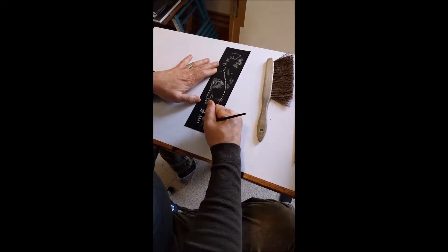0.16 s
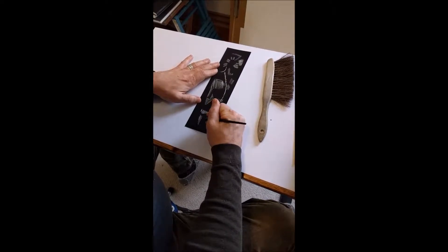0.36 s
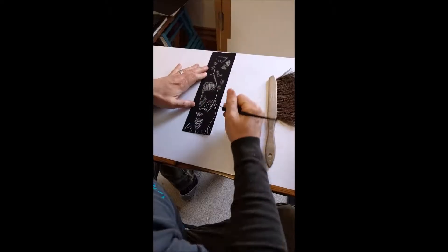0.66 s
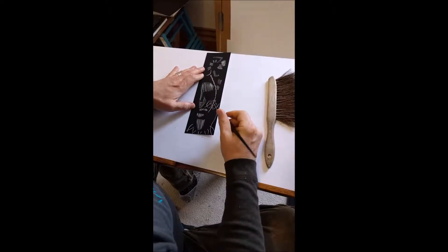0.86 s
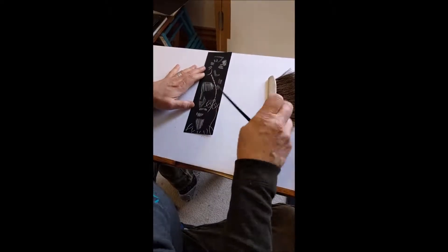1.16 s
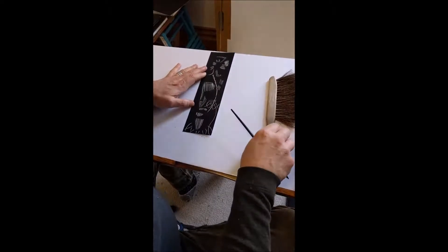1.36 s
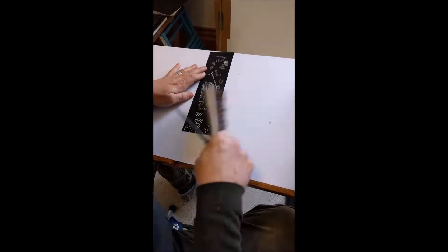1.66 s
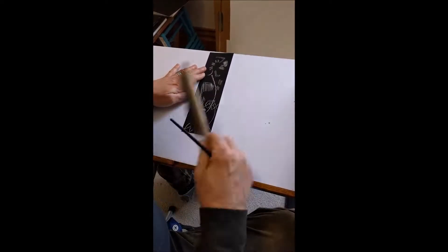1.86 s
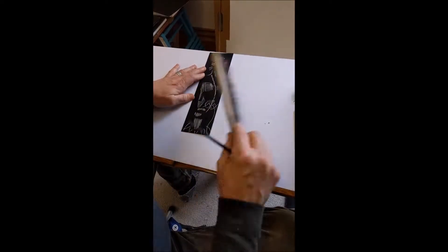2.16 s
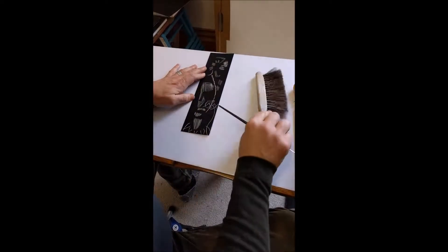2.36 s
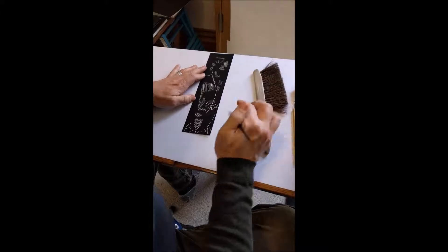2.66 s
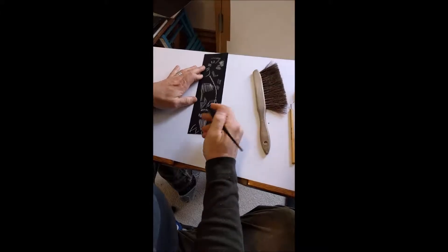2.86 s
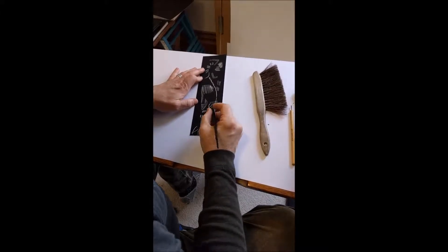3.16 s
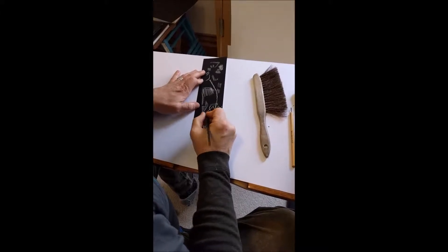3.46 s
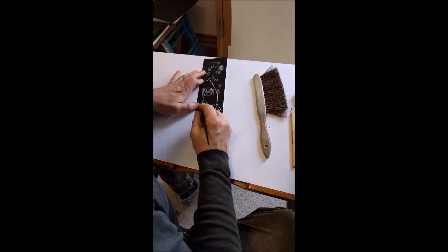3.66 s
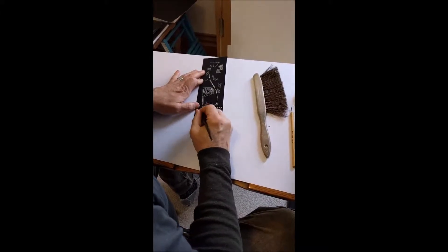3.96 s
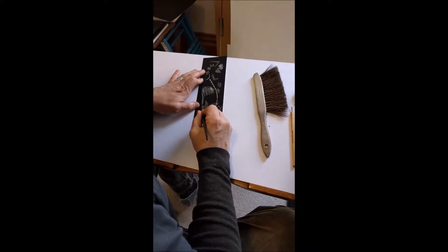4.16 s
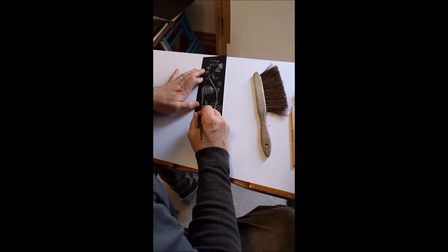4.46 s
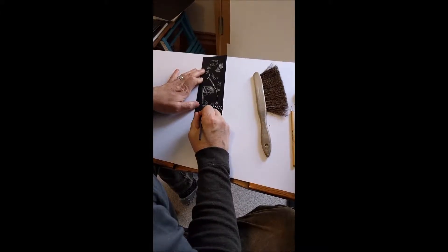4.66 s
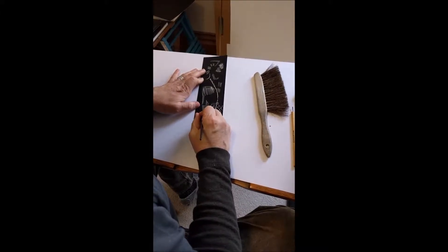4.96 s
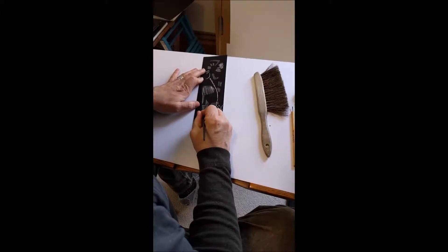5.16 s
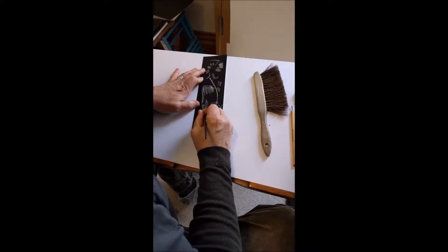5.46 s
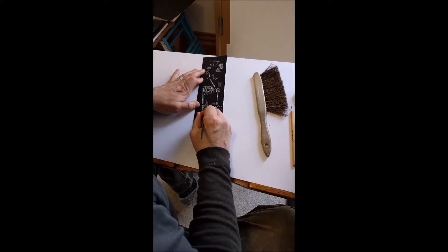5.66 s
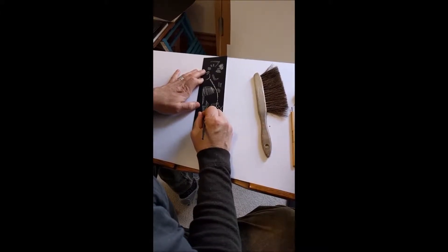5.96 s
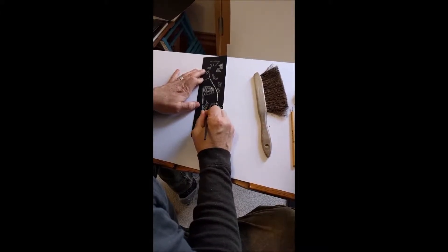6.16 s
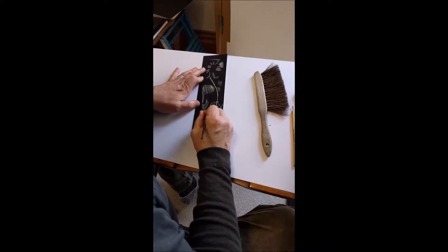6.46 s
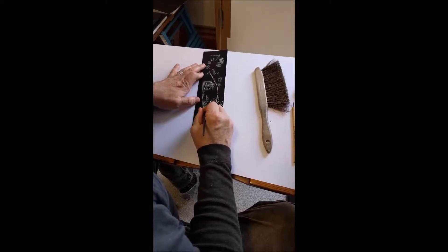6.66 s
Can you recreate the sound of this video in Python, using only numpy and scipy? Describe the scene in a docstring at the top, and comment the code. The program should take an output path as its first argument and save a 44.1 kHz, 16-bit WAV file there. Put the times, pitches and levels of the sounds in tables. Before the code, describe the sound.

A fine blade scratches a coated board, a stiff brush sweeps and knocks loudly on the table, then seven crisp short scratches follow indoors.

```python
"""Scratching a coated board

A fine blade scratches short strokes into a coated board on a table in a small room: chips of random noise.
In between, a hand brush sweeps the dust off (bursts of noise), is knocked on the table edge and laid down
(ringing modes). Hand and sleeve slide softly over the paper; the blade ticks down and scratches seven more times.
The recorder's noise gate turns everything down, with the room's rumble and hiss, when little else sounds."""
import sys
import numpy as np
from scipy import signal
from scipy.fft import rfft, irfft
from scipy.io import wavfile
from scipy.ndimage import uniform_filter1d

SR = 44100
rng = np.random.default_rng(int(sys.argv[2]) if len(sys.argv) > 2 else 0)


def persist_wave(psi):
    """Save psi, clipped to +-1, as 16-bit WAV."""
    counts = np.round(np.clip(psi, -1, 1) * 32767).astype(np.int16)
    wavfile.write(sys.argv[1], SR, np.atleast_2d(counts).T)


N = 300762  # length of the scene [samples]


def gain_of(db):
    """Turns decibels into a factor to multiply a sound by."""
    return 10 ** (np.asarray(db) / 20)


def evened(x):
    """Scales a sound to an average strength (rms) of 1."""
    return x / np.sqrt(np.mean(x ** 2) + 1e-20)


def read(points, hz):
    """Reads a curve at the frequencies hz, with straight lines between its points on a log-frequency axis."""
    point_hz, value = np.transpose(points)
    return np.interp(np.log(hz + 1), np.log(point_hz + 1), value)


def add(mix, start, sound):
    """Lays a sound into the mix, beginning at start seconds."""
    part = mix[max(round(start * SR), 0):][:len(sound)]
    part += sound[:len(part)]


def coloured(x, spectrum, size=4096):
    """Filters a sound to a spectrum; the filter rings only after a click, so the front stays sharp."""
    hz = abs(np.fft.fftfreq(size, 1 / SR))
    log_gain = np.log(gain_of(read(spectrum, hz)))
    # minimum phase: the phase follows from the log gain
    minimum_phase = np.exp(np.conj(signal.hilbert(log_gain)))
    response = np.fft.ifft(minimum_phase).real[:size // 2]
    return evened(signal.oaconvolve(x, response)[:N])


def wander(per_s):
    """A smooth random curve of rms 1 whose changes fade out above about per_s a second."""
    hz = np.fft.rfftfreq(N, 1 / SR)
    slow = rfft(rng.standard_normal(N)) * np.exp(-(hz / per_s) ** 2)
    return evened(irfft(slow, N))


def friction(slips_per_s, spread_db, hiss, catch_db, catches_per_s):
    """Rubbing: tiny slips of uneven size over a smooth hiss, which bunch where the surface catches."""
    size = gain_of(spread_db * np.minimum(rng.exponential(1, N), 4))
    direction = rng.choice([-1, 1], N)
    happens = rng.random(N) < slips_per_s / SR
    slips = evened(size * direction * happens)
    catching = gain_of(catch_db * wander(catches_per_s))
    return (slips + hiss * rng.standard_normal(N)) * catching


def ring(modes, contact_s, tilt_db=0):
    """A struck object: its modes start together and die away; a longer contact softens the onset."""
    t = np.arange(SR // 2) / SR
    swing = np.zeros(len(t))
    for hz, db, t60 in modes:
        # the tilt, in dB per octave, counts from the first mode in the list
        tilted_db = db + tilt_db * np.log2(hz / modes[0][0])
        swing += gain_of(tilted_db - 60 * t / t60) * np.cos(2 * np.pi * hz * t)
    onset = 1 - np.exp(-(t / contact_s) ** 2)
    b, a = signal.butter(3, 100, "high", fs=SR)  # little deep bass below 100 Hz sounds in the ring
    return -signal.lfilter(b, a, swing * onset)


def clock():
    """Times in seconds, half a millisecond apart, at which movements are worked out."""
    return np.arange(0, N, 22) / SR


def glide(start, length, db, skew, power):
    """Gain of one hand movement: its speed rises and falls in one arch, with an early peak if skew is under 1."""
    way = np.clip((clock() - start) / length, 0, 1)
    speed = abs(np.sin(np.pi * way ** skew))
    return gain_of(db) * speed ** power


def swell(start, rise_s, db, power, release_db_per_s):
    """Gain of a push that builds for rise_s and then dies away."""
    t = clock() - start
    build = np.clip(t / rise_s, 0, 1) ** power
    return build * gain_of(db - release_db_per_s * np.maximum(t - rise_s, 0))


def together(gains):
    """One gain for every sample; overlapping movements add in power."""
    total = np.sqrt(sum(gain ** 2 for gain in gains))
    return np.interp(np.arange(N) / SR, clock(), total)


# colour of the room's rumble and hiss: (frequency [Hz], level [dB per Hz])
AIR_COLOUR = [(20, -8), (50, 0), (90, -1), (130, -6), (300, -10), (700, -18), (1500, -25), (5400, -28),
              (6920, -20), (8600, -29), (16000, -30)]
AIR_DB = -61.5  # rms level ahead of the gate


def room_air():
    """The room's steady rumble and hiss: random noise, strongest in the bass."""
    return gain_of(AIR_DB) * coloured(rng.standard_normal(N), AIR_COLOUR)


# how long the room's echoes last: (frequency [Hz], time to fall by 60 dB [s])
ROOM_DECAY = [(150, 0.18), (500, 0.38), (1500, 0.23), (4000, 0.1839), (7000, 0.2067), (14000, 0.22)]
# how strong they are: (frequency [Hz], level [dB])
ROOM_LEVEL = [(150, -10), (400, -3), (600, -11), (900, -1.5), (1450, -2.5), (2000, -3), (7000, -5.5),
              (14000, -19)]
# first echoes from things on and near the table: (delay [s], level [dB])
EARLY_ECHOES = [(.0043, -14.5), (0.01, -16.5), (0.0225, -21)]


def room(x, tail_delay_s=0.0035):
    """Sparse echoes of random sign from near walls and furniture, each band dying at its own speed."""
    count = SR // 2
    taps = rng.standard_normal(count) * (rng.random(count) < 0.12)
    hz, t, bands = signal.stft(taps / np.linalg.norm(taps), SR, nperseg=256)
    t60 = read(ROOM_DECAY, hz)[:, None]
    # the square root keeps a long decay from carrying more energy than a short one
    decay = gain_of(-60 * t / t60) * np.sqrt(np.log(1000) / t60)
    level = gain_of(read(ROOM_LEVEL, hz))[:, None]
    tail = signal.istft(bands * decay * level, SR, nperseg=256)[1]
    echoes = np.zeros(N)
    add(echoes, tail_delay_s, signal.fftconvolve(x, tail))
    # small surfaces throw back only short waves
    treble = signal.sosfilt(signal.butter(1, 1500, "high", fs=SR, output="sos"), x)
    for delay, db in EARLY_ECHOES:
        add(echoes, delay, gain_of(db) * treble)
    return echoes


# slides of hand and sleeve over the paper: (start [s], length [s], level [dB])
SLEEVE_SLIDES = [(0.264, 0.25, -62), (0.424, 0.052, -56), (0.475, 0.26, -66), (2.162, 0.37, -56),
                 (2.466, 0.27, -51), (2.816, 0.16, -65.5), (2.893, .25, -52), (3.091, .47, -53),
                 (3.527, 0.27, -60.5)]
# colour of the sliding: (frequency [Hz], level [dB per Hz])
SLEEVE_COLOUR = [(400, -38), (1200, -16), (1900, -14), (3580, -6), (5500, -4.5), (6900, 5), (7700, -3),
                 (9300, -13), (16000, -23.5)]
SLIDE_SKEW, SLIDE_POWER = 0.72, 1.41  # fastest before the middle; sound grows as speed to this power


def sleeve():
    """Skin and cloth hiss softly on the paper, louder the faster they slide."""
    fibres = friction(slips_per_s=1500, spread_db=2.0, hiss=1.2, catch_db=0.6, catches_per_s=100)
    sliding = together(glide(*slide, SLIDE_SKEW, SLIDE_POWER) for slide in SLEEVE_SLIDES)
    return sliding * coloured(fibres, SLEEVE_COLOUR)


# the wooden brush meets the table:
# (time [s], thud level [dB], thud tilt [dB per octave], clack level [dB], click level [dB])
BRUSH_KNOCKS = [(0.6989, -56.5, -1, -39.5, -34), (0.7072, -48.5, -5, -38.5, -47),
                (0.7228, -60, -1, -44, -38), (0.756, -47.5, -4, -35.5, -28),
                (1.188, -40.5, 2, -19.5, -19.5), (1.2042, -56, 2, -29, -23), (1.237, -36, 0, -39.5, -21.5),
                (1.6151, -18, -0.5, -27, -7), (1.6621, -31, -5, -42, -43), (1.739, -21.5, 0.5, -52.5, -22),
                (1.764, -42.5, 7.5, -23.5, -15.5), (1.7802, -23, -0.5, -29.5, -44.5),
                (2.1525, -65, -11, -43.5, -24.5), (2.194, -66.5, 6, -48, -36.5),
                (2.826, -62, 0.5, -62.5, -50.5)]
# modes of the table before the tilt, which sound as the thud: (frequency [Hz], level [dB], time to fall by 60 dB [s])
TABLE_MODES = [(182, 9, 0.016), (148.6, -14.5, 0.16), (199.7, -13, .33), (254.7, -12.5, 0.31),
               (291, -17, 0.26), (388.6, -6.5, 0.11), (409, -8.5, 0.13), (450, -15, 0.0033), (530, -28, .2),
               (811.6, -17, .14), (890, -17, .12), (960, -14, 0.0096), (994, -25.5, 0.13), (1240, -22, 0.2),
               (1366, -15, 0.047), (1467, -16, 0.094), (1520, -12.5, 0.044)]
# modes of the brush's handle, the clack: (frequency [Hz], level [dB], time to fall by 60 dB [s])
HANDLE_MODES = [(1624, -15.5, 0.018), (2751, -8, 0.0091), (3167, 2, 0.0078), (3530, -1.5, 0.01),
                (4430, -12, .006)]
# modes of the brush's hard edge, the click: (frequency [Hz], level [dB], time to fall by 60 dB [s])
EDGE_MODES = [(5700, -13.5, 0.0036), (7117, -9.5, 0.011), (7064, 0, .005), (10000, -22.5, .001)]


def knocks():
    """Each blow rings the table, the handle and the brush's hard edge; the tilt makes the thud bright or dull."""
    out = np.zeros(N)
    clack = ring(HANDLE_MODES, contact_s=0.00017)
    click = ring(EDGE_MODES, contact_s=0.000098)
    for start, thud_db, tilt_db, clack_db, click_db in BRUSH_KNOCKS:
        thud = ring(TABLE_MODES, contact_s=0.00025, tilt_db=tilt_db)
        add(out, start, gain_of(thud_db) * thud + gain_of(clack_db) * clack + gain_of(click_db) * click)
    return out


# bristles bend against paper or board, then spring free: (start [s], bending time [s], level [dB])
BRISTLE_SWEEPS = [(0.67, 0.048, -45), (0.732, 0.027, -30), (0.802, 0.023, -39.5), (0.828, 0.079, -37),
                  (0.996, 0.056, -58), (1.144, 0.004, -45.5), (1.154, 0.0096, -46.5), (1.179, 0.03, -31.5),
                  (1.197, 0.023, -31), (1.221, 0.1, -36), (1.593, 0.0067, -29.5), (1.723, 0.071, -40),
                  (1.88, 0.129, -62), (2.138, 0.027, -44)]
# colour of the flicking tips: (frequency [Hz], level [dB per Hz])
BRISTLE_COLOUR = [(590, -59), (1000, -34), (1400, -25.5), (1980, -30.5), (2200, -22.5), (2680, -24.5),
                  (2810, -18), (4680, -3), (6700, 3.5), (9940, -13.5), (13300, -21.5), (16000, -23)]
BEND_POWER, SPRING_DB_PER_S = 0.85, 540  # how the sound grows as they bend, and dies when they let go
# the pressed-down brush drags: (start [s], pressing time [s], level [dB])
BRUSH_DRAGS = [(.669, .035, -41), (.745, 0.016, -41.5), (.785, 0.035, -50), (.905, 0.014, -50.5),
               (1.186, .004, -44.5), (1.235, 0.0039, -33.5)]
# colour of the board that takes up the drag: (frequency [Hz], level [dB per Hz])
BOARD_COLOUR = [(60, -10), (135, 2.5), (200, -8), (320, -9.5), (405, 4), (480, -17.5), (680, -21),
                (790, -2.5), (900, -28), (1400, -17), (2000, -20.5), (3000, -17), (6000, -25), (16000, -57)]
PRESS_POWER, EASE_DB_PER_S = 1.2, 400.5  # how the drag grows under pressure, and how fast it dies
# bristles quiver after the brush is flung against the edge: (start [s], level [dB])
BRISTLE_QUIVERS = [(1.593, -31), (1.738, -43.5)]
# colour of the quivering hairs: (frequency [Hz], level [dB per Hz])
HAIR_COLOUR = [(3000, -40), (6000, -23.5), (6800, -7), (7050, 2), (7300, -1), (7700, -5.5), (8600, -19),
               (12000, -39.5), (16000, -45)]
QUIVER_RISE_S, QUIVER_POWER, QUIVER_DB_PER_S = 0.0041, 0.99, 169.5


def bristles():
    """Many stiff hairs flick over board and paper, rub the board when pressed, and sing when shaken."""
    flicks = friction(slips_per_s=3700, spread_db=1.5, hiss=0.37, catch_db=2.84, catches_per_s=200)
    rubs = friction(slips_per_s=370, spread_db=-2.0, hiss=1.0, catch_db=4.0, catches_per_s=64)
    bending = together(swell(*sweep, BEND_POWER, SPRING_DB_PER_S) for sweep in BRISTLE_SWEEPS)
    pressing = together(swell(*drag, PRESS_POWER, EASE_DB_PER_S) for drag in BRUSH_DRAGS)
    shaking = together(swell(start, QUIVER_RISE_S, db, QUIVER_POWER, QUIVER_DB_PER_S)
                       for start, db in BRISTLE_QUIVERS)
    tips = bending * coloured(flicks, BRISTLE_COLOUR)
    board = pressing * coloured(rubs, BOARD_COLOUR)
    hairs = shaking * coloured(rng.standard_normal(N), HAIR_COLOUR)
    return tips + board + hairs


# the blade lands on the board, and now and then snags: (time [s], level [dB])
BLADE_TOUCHES = [(0.135, -35), (0.4928, -50.5), (4.335, -58), (4.444, -43), (4.873, -49.5), (4.9231, -42),
                 (5.231, -50.5), (5.2867, -39), (5.608, -54), (5.6471, -46), (5.718, -33), (5.912, -45),
                 (6.2445, -42.5), (6.55, -41), (6.8135, -44)]
# modes of the knife before the grip shifts them: (frequency [Hz], level [dB], time to fall by 60 dB [s])
KNIFE_MODES = [(103, -36, .08), (390, -29.5, 0.08), (3290, -3, 0.0068), (3870, 2.5, 0.006),
               (5930, 4, 0.0035), (7260, -2, 0.0065)]


def touches():
    """The knife ticks as it lands, with a faint bump of the board; the grip shifts its pitch."""
    out = np.zeros(N)
    grips = rng.uniform(0.94, 1.06, len(BLADE_TOUCHES))
    for (start, db), grip in zip(BLADE_TOUCHES, grips):
        gripped = [(hz * grip, mode_db, t60) for hz, mode_db, t60 in KNIFE_MODES]
        add(out, start, gain_of(db) * ring(gripped, contact_s=0.00017))
    return out


# strokes of the blade, the first already under way: (start [s], length [s], level [dB])
BLADE_STROKES = [(-0.099, 0.16, -44), (0.065, 0.12, -61.6), (0.12, 0.051, -45.5), (4.486, 0.102, -42.5),
                 (4.919, 0.12, -37.5), (5.263, 0.13, -37), (5.628, 0.14, -41), (5.965, 0.12, -35),
                 (6.285, 0.115, -34.5), (6.573, 0.12, -34.5)]
# colour of the scratching: (frequency [Hz], level [dB per Hz])
SCRATCH_COLOUR = [(250, -47.5), (410, -21), (560, -32), (820, -19.5), (1080, -29), (1270, -19.5),
                  (1850, -19.5), (2450, -10), (3300, -12.5), (3950, -6), (4600, -10.5), (5500, -5),
                  (6900, -0.5), (7600, -7.5), (8700, -19.5), (12200, -26), (13500, -21), (14500, -25),
                  (16000, -43)]
STROKE_SKEW, STROKE_POWER = 0.76, 1.92  # fastest before mid-stroke; sound grows as speed to this power


def blade():
    """The point chips off thousands of flakes a second; each stroke echoes off the hand a little differently."""
    flakes = friction(slips_per_s=3500, spread_db=1.5, hiss=0.74, catch_db=0.36, catches_per_s=140)
    chips = coloured(flakes, SCRATCH_COLOUR)
    out = np.zeros(N)
    lags = rng.integers(8, 36, len(BLADE_STROKES))  # delay of the hand's echo [samples]
    for stroke, lag in zip(BLADE_STROKES, lags):
        moving = together([glide(*stroke, STROKE_SKEW, STROKE_POWER)])
        out += moving * evened(chips + 0.3 * np.roll(chips, lag))
    return out


def scene():
    """The room's air, the work on the table, and its echoes."""
    direct = sleeve() + knocks() + bristles() + touches() + blade()
    return (room_air() + direct + room(direct))[None]


def gate(x, open_db=-62.5, slope=2.3, depth_db=17.5, release_db_per_s=105):
    """Opens within milliseconds when the treble rises above open_db, and sinks slowly shut afterwards."""
    band = signal.butter(2, [2000, 9000], "band", fs=SR, output="sos")
    treble = signal.sosfilt(band, x)
    power = abs(uniform_filter1d(treble ** 2, size=440))  # averaged over 10 ms
    power_db = 10 * np.log10(power + 1e-14)
    wanted_db = np.clip((power_db - open_db) * slope, -depth_db, 0)
    # the gain may drop no faster than the release
    fall = np.arange(N) / SR * release_db_per_s
    held_db = np.maximum.accumulate(wanted_db + fall) - fall
    smooth_db = signal.lfilter(np.ones(256) / 256, 1, held_db)
    return x * gain_of(smooth_db)


def record(dry):
    """The noise gate, then a steep filter that removes the treble above about 16100 Hz."""
    band_limit = signal.firwin(511, 16100, window=("kaiser", 9), fs=SR)
    return signal.oaconvolve(gate(dry[0]), band_limit, "same")[None]


dry = scene()
out = record(dry)
persist_wave(out)
```